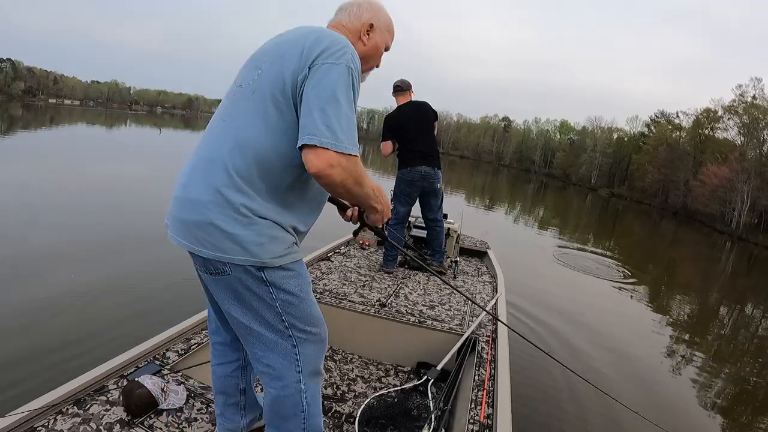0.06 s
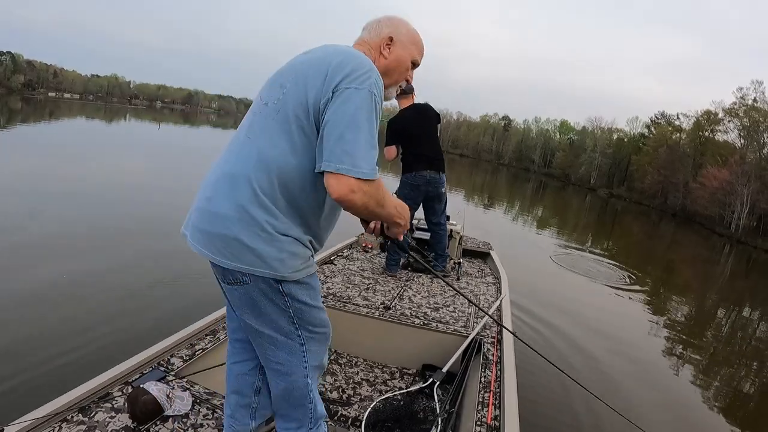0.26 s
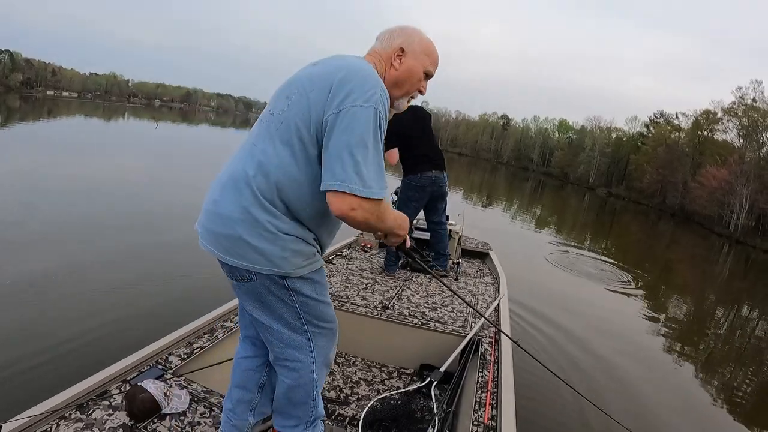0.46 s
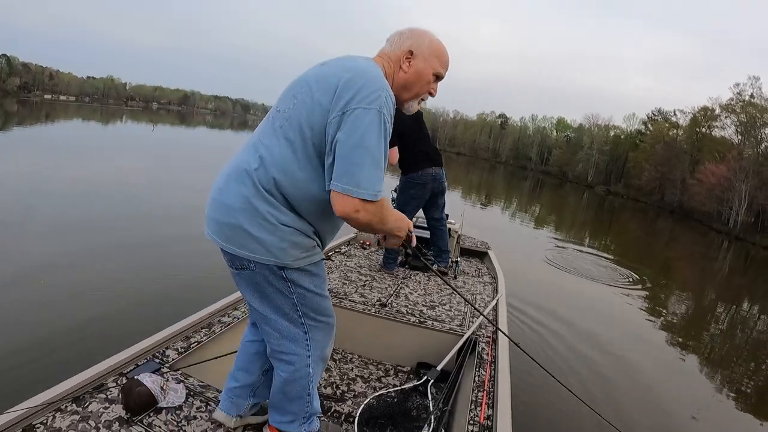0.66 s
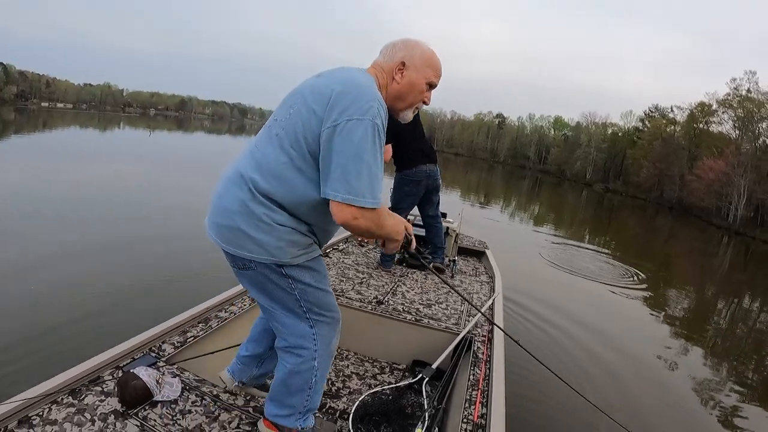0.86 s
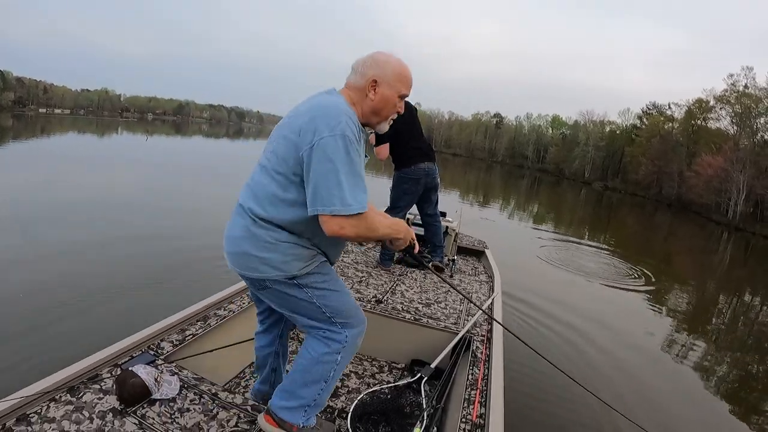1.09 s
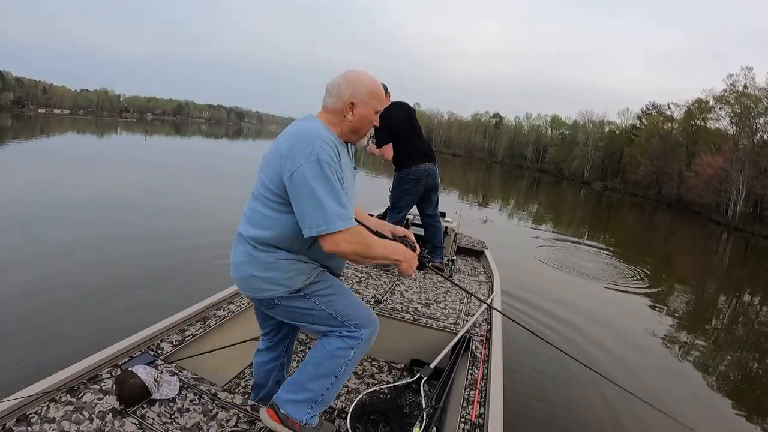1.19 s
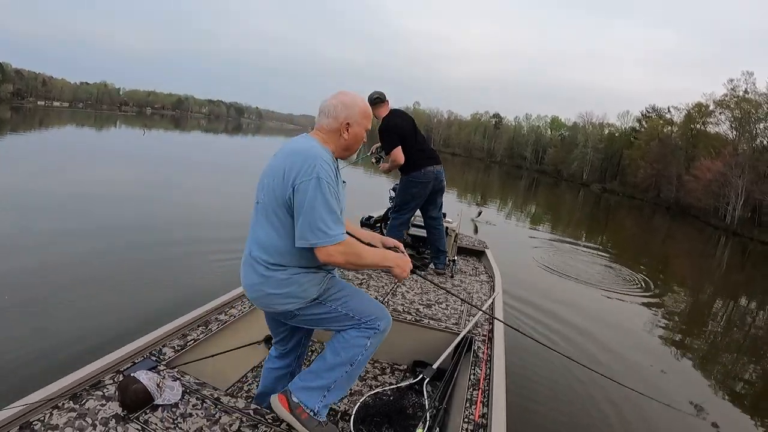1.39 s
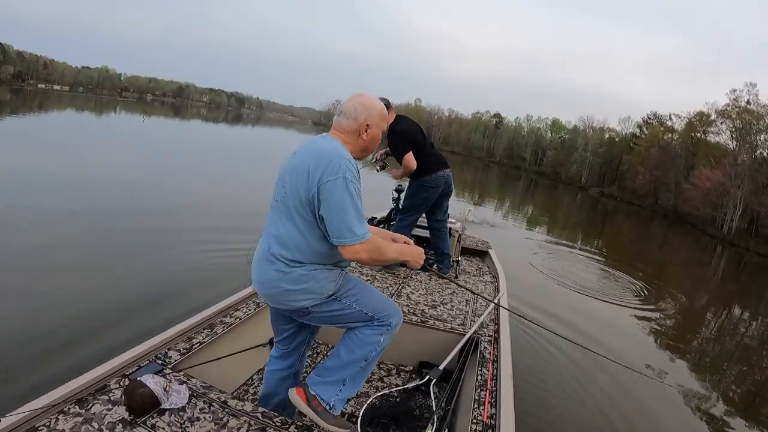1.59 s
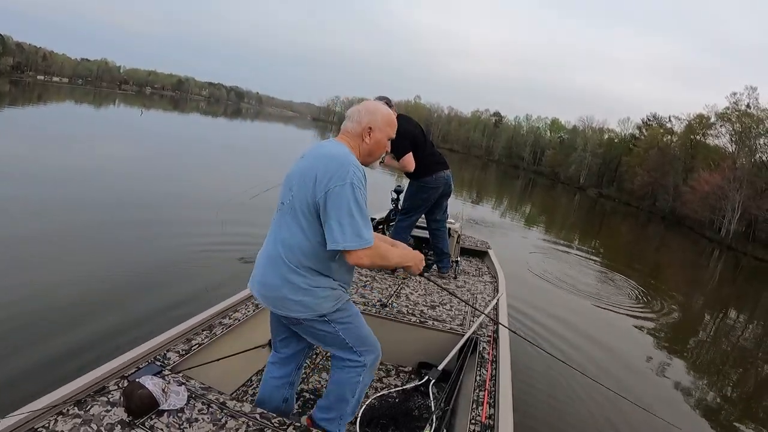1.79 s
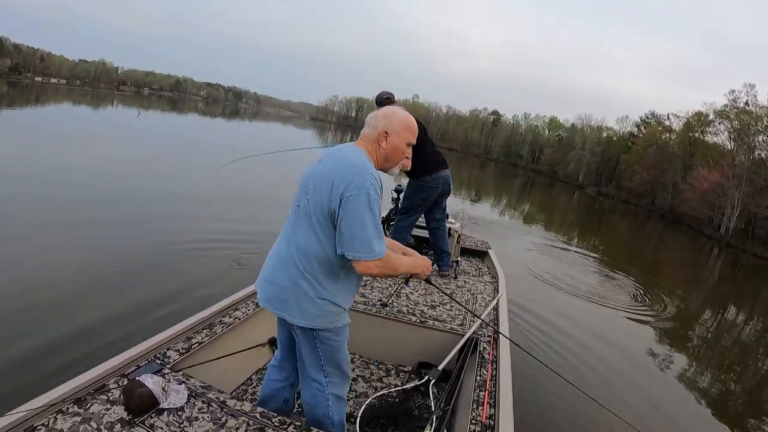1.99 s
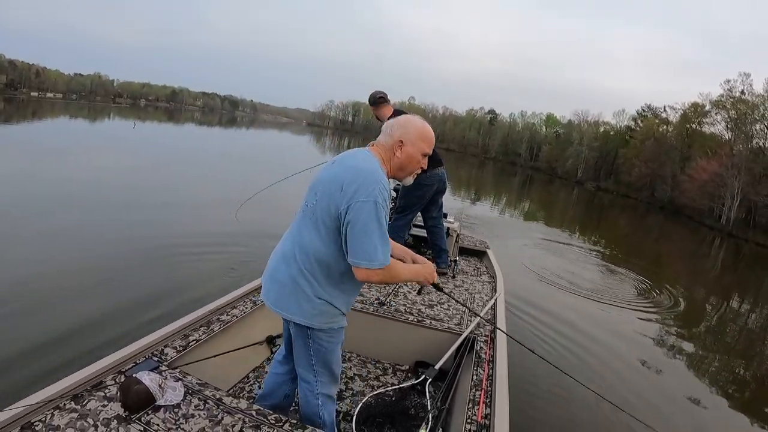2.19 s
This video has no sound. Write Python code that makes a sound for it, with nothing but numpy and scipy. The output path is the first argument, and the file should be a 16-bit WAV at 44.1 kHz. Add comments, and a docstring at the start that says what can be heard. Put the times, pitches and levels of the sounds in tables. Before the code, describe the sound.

Heard from the back of a small fishing boat, something bangs sharply on the metal hull. Dull footsteps, clicking tackle and light splashing at the bow follow, while a reel ticks steadily and a low hum continues underneath.

```python
"""A low hum, faint water and a ticking fishing reel on a calm lake; almost at once something hard
knocks on the small aluminium boat, whose plating clanks and whose hull booms. Tackle rattles, and an
angler steps down onto the carpeted deck with dull thumps. In the second half water splashes off the
bow as spray and droplets, gurgles in rising bubbles and slaps hollowly under the hull."""
import sys
import numpy as np
from scipy import signal
from scipy.fft import rfft, irfft
from scipy.io import wavfile
from scipy.ndimage import uniform_filter1d

SR = 44100
rng = np.random.default_rng(int(sys.argv[2]) if len(sys.argv) > 2 else 0)


def store_wav(level_fs):
    """Save 16-bit WAV to argv[1]."""
    pcm = np.round(np.clip(np.atleast_2d(level_fs), -1, 1) * 32767)
    wavfile.write(sys.argv[1], SR, pcm.T.astype(np.int16))


N = 99225
T = np.arange(N) / SR
BIN_HZ = np.arange(N // 2 + 1) * SR / N
LOW_MODE_HZ = 130  # hull and deck modes below this carry the boom


def undb(db):
    """Decibels to gain."""
    return 10 ** (np.asarray(db) / 20)


def shape(points):
    """Gain at every frequency bin from (freq_hz, level_db) points."""
    hz, db = np.array(points, float).T[:2]
    return undb(np.interp(np.log(BIN_HZ + 1), np.log(hz), db))


# Stereo width of diffuse sound: freq_hz, side_over_mid_db
STEREO_WIDTH = [(60, -21), (200, -19.5), (600, -9), (2000, -8), (5000, -8.5), (9000, -9), (13000, -4.5)]
def noise(points, side_db=0):
    """Coloured stereo noise, wider in the treble, with a mid channel of rms 1."""
    mid, side = rfft(rng.standard_normal((2, N))) * shape(points)
    mid = irfft(mid, N)
    side = irfft(side * shape(STEREO_WIDTH), N) * undb(side_db)
    return np.array([mid + side, mid - side]) / mid.std()


def bands(x, centres_hz):
    """Split a sound into overlapping bands that sum back to it."""
    spectrum, log_hz = rfft(x), np.log(BIN_HZ + 1)
    return [irfft(spectrum * np.interp(log_hz, np.log(centres_hz), row), N)
            for row in np.eye(len(centres_hz))]


def fade(at, t60, rise_s=0.00036):
    """Quick attack and exponential decay from a given moment."""
    out = np.zeros(N)
    live = slice(int(at * SR) + 1, int((at + 2 * t60) * SR) + 2)
    age = T[live] - at
    out[live] = (1 - np.exp(-age / rise_s)) * np.exp(-np.log(1000) * age / t60)
    return out


def ring(at, hz, t60, rise_s=0.0002):
    """One damped mode."""
    return fade(at, t60, rise_s) * np.sin(2 * np.pi * hz * (T - at))


def dense_ring(at, table, rise_s):
    """Noise stands for countless close modes, each band dying at its own rate."""
    parts = bands(noise(table, side_db=-4.5), [hz for hz, _, _ in table])
    return sum(part * fade(at, t60, rise_s) for part, (_, _, t60) in zip(parts, table))


def drift(rate_hz):
    """Smooth random drift with a spread near 1."""
    hold = int(SR / rate_hz)
    steps = np.repeat(np.clip(rng.standard_normal(400), -2, 2), hold)[:N + 2 * hold]
    return 1.266 * uniform_filter1d(uniform_filter1d(steps, hold), hold)[hold:hold + N]


def flicker(x, depth_db, rate_hz):
    """Let each octave waver in level by itself."""
    return sum(part * undb(depth_db * drift(rate_hz)) for part in bands(x, 2. ** np.arange(7, 15)))


def add(out, at, x):
    """Mix a short mono or stereo sound in at a given time."""
    start = int(np.clip(at * SR, 0, N - 1))
    out[:, start:start + x.shape[-1]] += x[..., :N - start]


def bubble(hz, cycles, glide=0.13):
    """A bubble that rises in pitch as it dies."""
    life = np.arange(int(cycles / hz * SR) + 2) * hz / cycles / SR
    envelope = np.exp(-4 * life) * (1 - np.exp(-life * cycles * 2))
    return envelope * np.sin(2 * np.pi * cycles * life * (1 + glide * life))


# Partials of the hum: pitch_hz, rms_db
HUM_PARTIALS = [(62, -51.5), (91, -52.5), (118, -56.5), (178, -57), (228, -66)]
def hum(waver_db=5.5, pitch_waver=0.01042):
    """A low hum, probably the electric bow motor, each partial wavering in level and pitch."""
    out = 0
    for hz, db in HUM_PARTIALS:
        gain = np.sqrt(2) * undb(db + waver_db * drift(7.03))
        pitch_hz = hz * (1 + pitch_waver * drift(8.9))
        out += gain * np.sin(2 * np.pi * np.cumsum(pitch_hz) / SR)
    return out


# Tone of the bed of water and air: freq_hz, density_db
AMBIENCE_EQ = [(10, -6), (22, -2), (70, 0), (130, -2.5), (250, -10), (450, -22), (800, -23.5), (1400, -22),
               (3200, -31), (5200, -29), (8000, -38), (12000, -48.5), (15500, -71)]
def ambience():
    """Water and air lay down a soft, flickering bed of rumble and hiss."""
    return undb(-44.5) * flicker(noise(AMBIENCE_EQ), depth_db=3, rate_hz=30.2)


# Tone of the spray: freq_hz, density_db
SPRAY_EQ = [(30, 18), (80, 1.5), (170, 5.5), (260, 6.5), (450, 2), (1000, -1.5), (2200, -4), (4800, -2),
            (7500, -9.5), (11000, -17.5), (15500, -34)]
# Fader ride on spray and droplets: time_s, gain_db
SPLASH_RIDE = [(0, -16.5), (.3, -14.5), (.7, -31), (.9, -11.5), (1.15, -13), (1.3, -9.5), (1.44, -2.5),
               (1.62, -2), (1.76, -5), (1.83, -1), (2.03, -3), (2.25, -3.5)]
def splash(drops_per_s=600, low_hz=863, high_hz=9740):
    """Spray hisses off the bow and droplets ring as tiny bubbles; both swell with the splashing."""
    drops = np.zeros((2, N))
    for when, pitch, size, length, pan in rng.random((int(drops_per_s * N / SR), 5)):
        hz = low_hz * (high_hz / low_hz) ** pitch
        db = -43.5 - 4 * np.log(1 - 0.98 * size)  # many faint, a few loud
        pan_db = 2.23 * (1.5 - pan) * np.array([[-1], [1]])  # leaning right
        add(drops, when * N / SR, undb(db + pan_db) * bubble(hz, cycles=3 + 18 * length))
    spray = undb(-41) * flicker(noise(SPRAY_EQ), depth_db=3.5, rate_hz=45.27)
    ride_db = np.interp(T, *np.array(SPLASH_RIDE).T)
    return (drops + spray) * undb(ride_db)


# Resonances of the reel housing: pitch_hz, width_hz, gain_db
REEL_HOUSING = [(1420, 180, -3), (2240, 69, 4.5), (2580, 58, 1.5), (3070, 125, 2), (4070, 71, 0.5),
                (4680, 220, 2), (5410, 140, 1), (6820, 190, -5.5), (8250, 350, -13.5), (9380, 310, -12),
                (10080, 160, -10), (11870, 210, -15)]
def reel(ticks_per_s=44.9, jitter_s=0.0029, weak_db=-8.5, scatter_db=2.5):
    """A reel is cranked steadily: its gears tick strong and weak in turn and ring the housing."""
    beats = np.arange(110)
    late, loud = rng.standard_normal((len(beats), 2)).T
    strength = undb(weak_db * (beats % 2) + scatter_db * np.clip(loud, -2, 2))
    start_s = np.abs(beats / ticks_per_s + jitter_s * late)
    kicks = np.bincount((start_s * SR).astype(int), strength, N)[:N]
    envelope = signal.fftconvolve(kicks, fade(0, t60=0.053, rise_s=0.00082))[:N]
    grind = envelope * noise([(20, 0), (20000, 0)], side_db=1.8)
    f = BIN_HZ + 1
    housing = sum((-1) ** k * undb(db) / (1 + 1j * hz / width * (f / hz - hz / f))
                  for k, (hz, width, db) in enumerate(REEL_HOUSING))
    return undb(-35.5) * irfft(rfft(grind) * housing, N)


# Cues for gear bumping the deck: start_s, level_db
BUMP_CUES = [(0.1105, -30), (0.139, -38), (2.006, -37)]
# Body of a bump: freq_hz, density_db, t60_s
BUMP_BANDS = [(100, -6, 0.054), (497, 2, 0.11), (890, -2.5, 0.051), (1800, -13.5, 0.036),
              (6000, -13, 0.032), (15000, -60, .02)]
def gear_bumps():
    """Gear bumps lightly on the deck with a short, pitchless ring."""
    return sum(undb(db) * dense_ring(at, BUMP_BANDS, rise_s=0.00089) for at, db in BUMP_CUES)


# Cue for the hard knock: start_s, level_db
KNOCK_CUES = [(.2329, 0)]
# Boom and ring of the hull: pitch_hz, level_db, t60_s
HULL_MODES = [(63.5, -4.5, 0.19), (78.2, -16.5, 0.34), (122, -29, 0.19), (188, -24.5, 0.22),
              (220, -28.5, 0.61), (249, -24, 0.24), (354, -26, 0.14), (663, -36, .22), (750, -31.5, 0.2),
              (1024, -34, 0.33), (1238, -29, 0.18), (1777, -34, 0.16), (2085, -29, 0.074),
              (2280, -24.5, 0.14), (2480, -32, 0.091), (2650, -35, 0.067), (3300, -29.5, 0.1),
              (3520, -24, 0.085)]
# Clank of the plating: freq_hz, density_db, t60_s
PLATING_BANDS = [(60, 3, 0.9), (197, -3.5, 0.37), (543, -9, .28), (1190, -7.5, 0.2), (1680, -4.5, 0.16),
                 (2400, 1, 0.094), (3220, -14, 0.19), (4000, -14, 0.18), (5520, -23, .1), (7700, -32, 0.07),
                 (15000, -43, 0.034)]
def hull_knock(boom_lag_s=0.007):
    """A hard contact cracks, the plating clanks and the whole hull booms a moment later."""
    snap_eq = [(1000, -40), (4500, 10.5), (8000, -14.5), (15000, -23)]
    out = 0
    for at, db in KNOCK_CUES:
        modes = 0
        for k, (hz, mode_db, t60) in enumerate(HULL_MODES):
            if hz < LOW_MODE_HZ:
                modes -= undb(mode_db) * ring(at + boom_lag_s, hz, t60, rise_s=0.0069)
            else:
                modes += (-1) ** k * undb(mode_db) * ring(at, hz, t60, rise_s=0.0014)
        crack = undb(-10.5) * ring(at, hz=2340, t60=0.018)
        snap = undb(-8) * fade(at, t60=0.0053) * noise(snap_eq, side_db=-4.5)
        clank = undb(-15.5) * dense_ring(at, PLATING_BANDS, rise_s=0.0003)
        out += undb(db) * (modes + crack + snap + clank)
    return out


# Cues for ticking tackle: start_s, level_db, pitch_hz, t60_s
TICK_CUES = [(.404, -42.5, 2700, 0.018), (.583, -34.5, 2900, 0.0044), (.679, -44, 2450, 0.033),
             (.843, -39.5, 5780, 0.014), (.891, -33, 2940, 0.017), (0.935, -38, 3020, .012),
             (.965, -34.5, 6700, 0.008), (.967, -34.5, 2250, 0.11), (1.066, -35.5, 3020, 0.047),
             (1.196, -33, 4460, 0.013), (1.245, -37.5, 5460, 0.015), (1.372, -29.5, 2160, 0.013),
             (1.515, -28, 5120, 0.018), (1.533, -27, 3370, 0.0089), (1.612, -32, 2870, 0.028),
             (1.703, -28, 3780, 0.015), (1.804, -25.5, 4900, 0.016), (2.019, -25.5, 5900, 0.0043),
             (2.123, -33, 1860, 0.049)]
def tackle_ticks():
    """Rod and tackle rattle in small ticks, part ping and part grit, with a short scattered tail."""
    out = 0
    for at, db, hz, t60 in TICK_CUES:
        ping = 0.5 * ring(at, hz, t60, rise_s=0.00017)
        grit = noise([(hz / 5, -24), (hz / 2, -3), (hz, 0), (hz * 1.52, -7), (hz * 3, -32)])
        burst = 0.5 * fade(at, t60, rise_s=0.0008)
        tail = undb(-9) * fade(at, t60=0.04, rise_s=0.0014)
        out += undb(db) * (ping + grit * (burst + tail))
    return out


# Cues for footfalls: start_s, thump_db, low_boost_db, scuff_db
STEP_CUES = [(1.2151, 4.5, 0.5, -23), (1.967, -12, 12.5, -34)]
# Thump of the deck panel: pitch_hz, level_db, t60_s
DECK_MODES = [(82.2, -28.5, 0.35), (116.5, -29, 0.24), (197.7, -26, 0.27), (241.2, -13, 0.095),
              (290, -12, 0.053), (347.3, -24, 0.1), (415, -29, 0.084), (537, -31.5, 0.059)]
# Scuff of a sole: freq_hz, density_db, t60_s
SCUFF_BANDS = [(100, 0.5, 0.55), (383, -9.5, 0.34), (720, -14, 0.16), (1350, -11.5, 0.058),
               (2200, -28, 0.15), (5970, -46, 0.069), (15000, -61, .05)]
def footsteps():
    """Soft shoes scuff and thump the deck, whose neighbouring modes swing in opposite directions."""
    out = np.zeros((2, N))
    for at, thump_db, low_boost_db, scuff_db in STEP_CUES:
        for k, (hz, mode_db, t60) in enumerate(DECK_MODES):
            gain = undb(thump_db + mode_db + low_boost_db * (hz < LOW_MODE_HZ))
            out += (-1) ** k * gain * ring(at, hz, t60, rise_s=0.0028)
        out += undb(scuff_db) * dense_ring(at, SCUFF_BANDS, rise_s=0.0018)
    return out


# Cues for gurgles: start_s, level_db, pitch_hz
GURGLE_CUES = [(1.41, -37, 990), (1.52, -36, 416), (1.66, -34, 368), (1.715, -37.5, 930), (1.83, -30, 1150),
               (1.875, -35, 448), (1.9, -28.5, 824), (2.002, -35.5, 683), (2.024, -31.5, 569),
               (2.048, -38.5, 940), (2.075, -39.5, 311), (2.176, -36.5, 1530)]
def gurgles(cycles=18, followers=4, follower_db=-5.5, spread_s=0.031, spread_oct=0.43):
    """Each gurgle is a main bubble followed by a few weaker ones near its pitch."""
    out = np.zeros((2, N))
    for at, db, hz in GURGLE_CUES:
        add(out, at, undb(db) * bubble(hz, cycles))
        for late, pitch in rng.random((followers, 2)):
            follower = bubble(hz * 2 ** (spread_oct * (2 * pitch - 1)), cycles)
            add(out, at + spread_s * late, undb(db + follower_db) * follower)
    return out


# Cues for water slapping the hull: start_s, level_db, pitch_hz
SLAP_CUES = [(1.429, -31, 62.2), (1.57, -56, 107), (2.119, -34, 186), (2.199, -34, 186)]
def water_slaps(t60_cycles=22):
    """Wavelets knock hollowly under the rocking hull."""
    return sum(undb(db) * ring(at, hz, t60_cycles / hz, rise_s=0.002) for at, db, hz in SLAP_CUES)


# Cue for the sharp snap of tackle: start_s, level_db, pitch_hz
SNAP_CUES = [(1.6475, -13, 5080)]
def tackle_snap(width_s=0.00016):
    """Tackle snaps in a click of barely two cycles, scattered briefly by the deck."""
    tail_eq = [(1000, -29), (3500, -1), (7000, -2), (10000, -10), (15000, -37)]
    out = 0
    for at, db, hz in SNAP_CUES:
        window = np.exp(-np.minimum(((T - at) / width_s) ** 2, 40))
        click = -np.cos(2 * np.pi * hz * (T - at)) * window
        tail = undb(-10.5) * fade(at, t60=0.017) * noise(tail_eq)
        out += undb(db) * (click + tail)
    return out


def radiate(x, cutoff_hz=53.4):
    """The hull radiates little below its lowest mode."""
    return signal.sosfilt(signal.butter(2, cutoff_hz, "high", fs=SR, output="sos"), x)


def from_right(x, lag_s=0.00002):
    """Sound from a little to the right reaches the left channel a hair later."""
    left = irfft(rfft(x[0]) * np.exp(-2j * np.pi * BIN_HZ * lag_s), N)
    return np.array([left, x[1]])


def scene():
    """Everything as heard from the stern."""
    boat = from_right(radiate(hull_knock() + footsteps() + gear_bumps()))
    fishing = tackle_ticks() + tackle_snap() + reel()
    water = splash() + gurgles() + water_slaps()
    return boat + fishing + water + hum() + ambience()


def record(dry):
    """Trim the deepest rumble and cut the very top."""
    low_cut = signal.butter(1, 7.3, "high", fs=SR, output="sos")
    high_cut = signal.ellip(8, 0.2, 70, 15800, fs=SR, output="sos")
    return signal.sosfilt(high_cut, signal.sosfilt(low_cut, dry))


dry = scene()
out = record(dry)
store_wav(out)
```